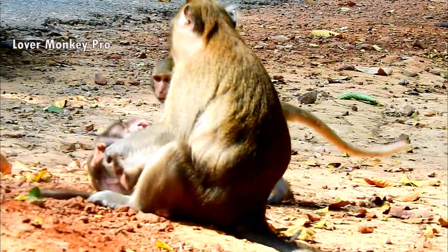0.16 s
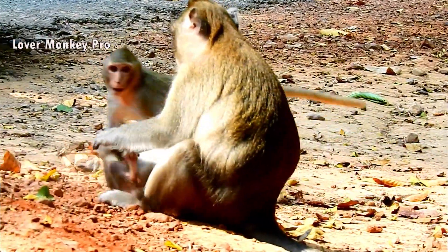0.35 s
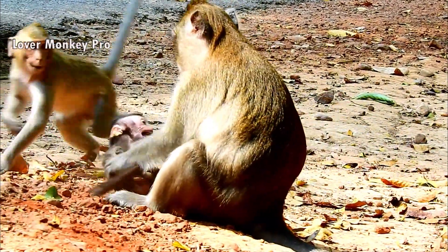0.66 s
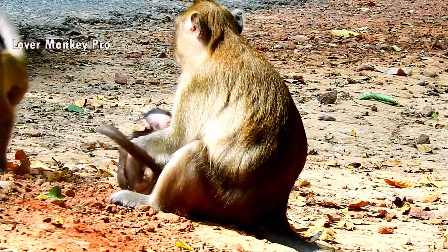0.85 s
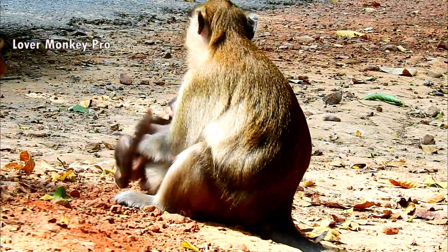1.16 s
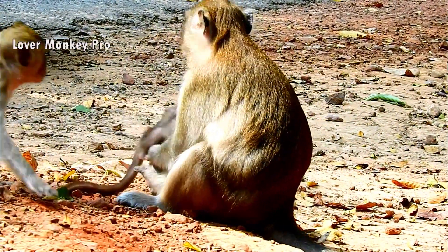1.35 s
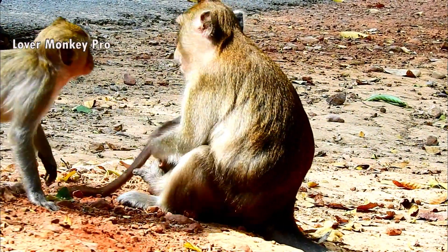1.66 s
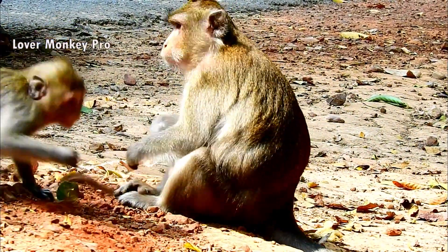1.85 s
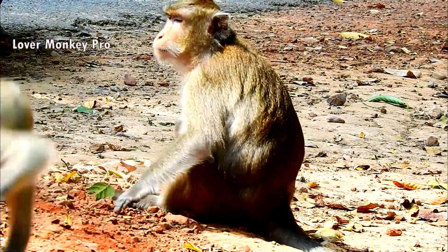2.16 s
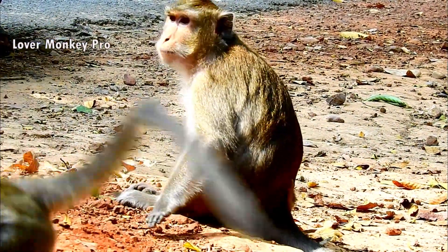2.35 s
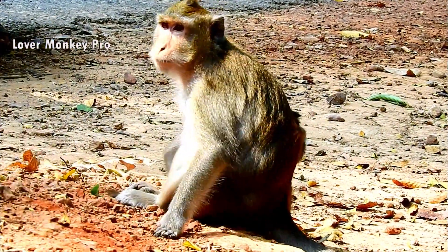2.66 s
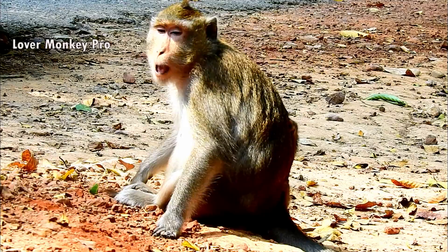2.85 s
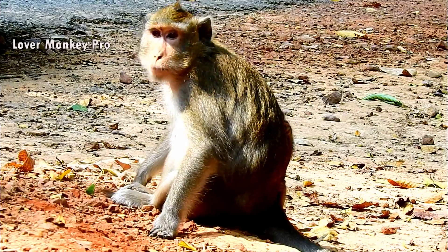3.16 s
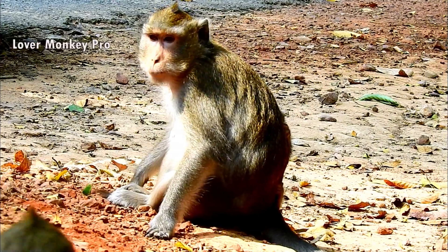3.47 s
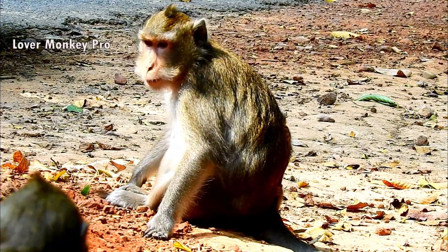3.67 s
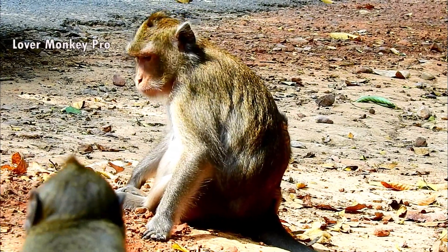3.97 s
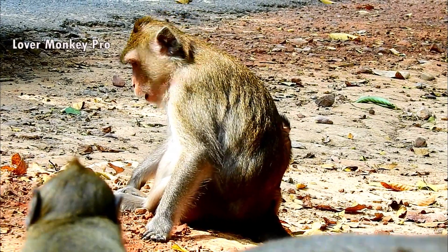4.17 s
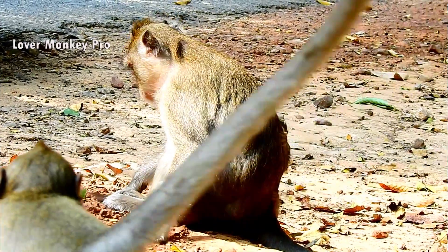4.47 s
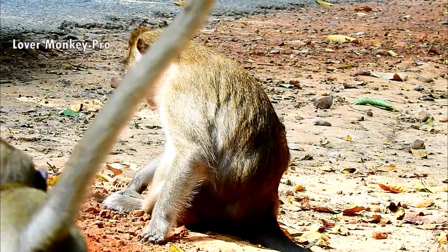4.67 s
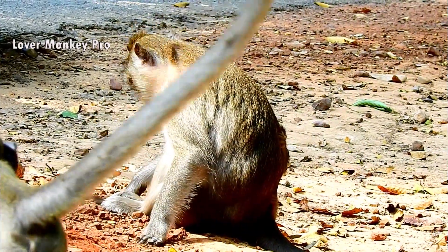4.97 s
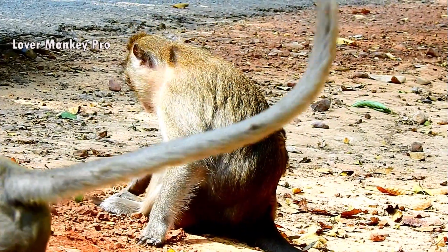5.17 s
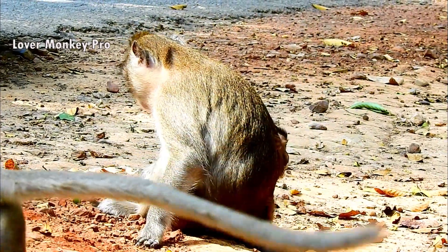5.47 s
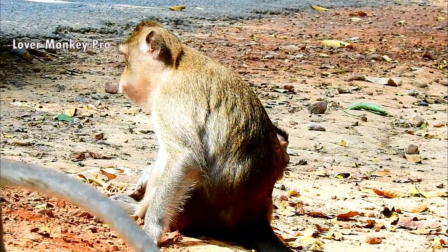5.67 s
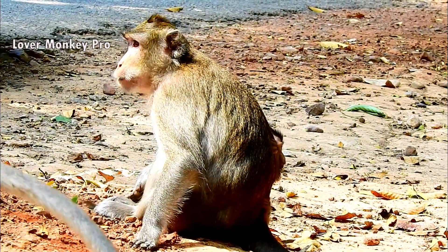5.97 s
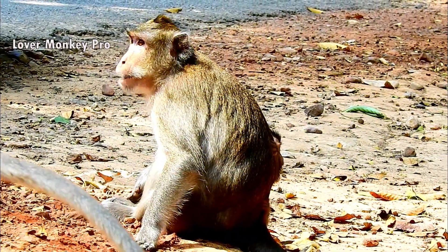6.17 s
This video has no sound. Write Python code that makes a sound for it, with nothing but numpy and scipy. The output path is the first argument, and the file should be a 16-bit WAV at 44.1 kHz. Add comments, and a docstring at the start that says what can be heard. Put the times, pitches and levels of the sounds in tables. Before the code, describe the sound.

From the start to about 1.3 seconds an infant monkey screeches close by: loud, harsh, noisy bursts in a very high register, with thin gliding whistles on top and a short pitched squeal near 0.4. A regular stutter, about nine and a half clicks a second, drops tiny slowed scraps of the earlier sound in with hard edges; between 1.3 and 1.8 it is nearly alone. From 1.85 to 3.0 feet scuff grit and dry leaves, with crisp snaps near 1.93 and 2.57 and the strongest crunch around 2.8. Two smooth rising coos come at about 3.2-3.6 and 3.8-4.1, the second brighter. Faint leaf ticks and weak thin calls follow from 4.3 to 5.6. Around 5.6-6.2 soft coos and a short higher call overlap small scuffs. Quiet open air, faint road rumble, short scatter, stereo.

```python
"""Stuttering macaques on leaf litter

An infant screeches with thin whistles on top, feet scuff leaves and grit, young ones coo and chirp.
Screeches are noise in throat resonances, whistles and calls are sines, litter is clumped ringing cracks.
About nine and a half times a second two slowed scraps of the scene cut in hard, with a short blur behind.
"""
import sys
import numpy as np
from scipy import signal
from scipy.fft import rfft, irfft
from scipy.io import wavfile
from scipy.ndimage import map_coordinates

SR = 44100
rng = np.random.default_rng(int(sys.argv[2]) if len(sys.argv) > 2 else 0)


def file_out(sig):
    """Save sig as 16-bit WAV at sys.argv[1]."""
    # one column per channel
    cols = np.atleast_2d(sig).T
    # limit, then scale
    lim = np.clip(cols, -1, 1)
    pcm = np.round(lim * 32767).astype(np.int16)
    wavfile.write(sys.argv[1], SR, pcm)


N = 279153
FIRST_STUTTER_S, STUTTER_EVERY_S, STUTTER_S = .0402, .10551, .0133


def amp(db):
    """dB to gain."""
    return 10 ** (np.asarray(db) / 20)


def rms_one(x):
    """Scale to rms 1."""
    return x / np.sqrt(np.mean(x ** 2) + 1e-20)


def at_hz(points, hz):
    """Read a spectrum in dB on a log-frequency axis."""
    points_hz, points_db = np.transpose(points)
    return np.interp(np.log(hz), np.log(points_hz), points_db)


def drift(corner_hz):
    """Smooth chance of spread 1: noise through two equal low-pass poles, drawn at every 8th sample."""
    r = np.exp(-16 * np.pi * corner_hz / SR)
    noise = rng.standard_normal(N // 8 + 1202)
    slow = signal.lfilter([1], [1, -2 * r, r * r], noise)[1200:]  # settled part
    return np.interp(np.arange(N) / 8, np.arange(len(slow)), rms_one(slow))


def resonance(x, hz, width_hz):
    """Two poles, gain 1 on top."""
    r = np.exp(-np.pi * width_hz / SR)
    zeros = np.array([1, 0, -1]) * (1 - r * r) / 2
    poles = [1, -2 * r * np.cos(2 * np.pi * hz / SR), r * r]
    return signal.lfilter(zeros, poles, x + 1e-18)


def twice(x, hz, width_hz):
    """The same resonance twice: steep flanks."""
    return resonance(resonance(x, hz, width_hz), hz, width_hz)


def swells(rows):
    """Level in dB of each layer: every event rises to its peak and falls away in straight dB slopes."""
    out = np.full((len(rows[0]) - 3, N), -140.)
    t = np.arange(N) / SR
    for peak_s, *levels_db, rise, fall in rows:
        a, b = max(int((peak_s - .6) * SR), 0), int((peak_s + .9) * SR)
        late_s = t[a:b] - peak_s
        slope_db = np.where(late_s < 0, abs(rise) * late_s, -abs(fall) * late_s)
        out[:, a:b] = np.maximum(out[:, a:b], np.array(levels_db)[:, None] + slope_db)
    return out


def voiced(calls, orders, wobble, flutter_db):
    """Harmonic calls; each partial flutters in level on its own, strain shifts all but the first listed."""
    out, unsteady, fade_s = np.zeros(N), 1 + wobble * drift(48.7), .0091
    # higher partials flutter more
    partials_db = [db + flutter_db * np.sqrt(k) * drift(38) for k, db in orders]
    for rows in calls:
        s, *columns = np.transpose(rows)
        at = np.arange(round(s[0] * SR), min(round((s[-1] + fade_s) * SR), N))
        hz, level_db, strain_db = [np.interp(at / SR, s, c) for c in columns]
        phase = 2 * np.pi * np.cumsum(hz * unsteady[at]) / SR
        first, *over = [amp(db[at]) * np.sin(k * phase) for (k, _), db in zip(orders, partials_db)]
        fade = np.clip(np.minimum(at - at[0], at[-1] - at) / SR / fade_s, 0, 1)
        out[at] += fade * amp(level_db) * (first + amp(strain_db) * sum(over))
    return out


# background spectrum: pitch_hz, relative_db
AIR_SPECTRUM = [(15, -66.5), (25, -11.5), (114, 10), (229, -1.5), (405, 4), (624, -1.5), (887, 0), (962, 8),
                (1260, -6.5), (1650, -52.5), (5570, -58.5), (6560, -22.5), (16000, -52)]
AIR_DB = -76.0  # typical, rms of the part alike in both ears


def air():
    """Far road rumble and hiss: shaped noise, gently patchy, partly alike in both ears."""
    hz = np.maximum(np.fft.rfftfreq(N, 1 / SR), 10)
    shape = amp(at_hz(AIR_SPECTRUM, hz))
    mid, side = irfft(rfft(rng.standard_normal((2, N))) * shape, N)
    return amp(AIR_DB + 2.0 * drift(3.6)) * rms_one(mid + 0.13 * side * np.array([[1], [-1]]))


# throat resonances in four groups (low, mouth, upper, top): pitch_hz, width_per_pass_hz, relative_db
THROAT = [
    [(3170, 430, -11.5), (3874, 370, -4.5), (4223, 460, 3), (4750, 110, 1.5)],
    [(5406, 840, 2), (5976, 500, 0.5), (6720, 280, -0.5), (7454, 390, 0), (7900, 620, -6)],
    [(9296, 990, 5.5), (10500, 800, 0)],
    [(12000, 980, -4.5), (13500, 1000, -17.5)],
]
# screech bursts: peak_s, low_db, mouth_db, upper_db, top_db, rise_db_per_s, fall_db_per_s
BURSTS = [(.034, -47.5, -51.5, -57.5, -70, 3000., 100.), (0.056, -35.5, -26, -26, -36, 4999.5, 500.),
          (.1, -50.5, -39.5, -44, -43, 400., 40.), (.17, -48, -33.5, -39.5, -42, 300., 277.2),
          (0.234, -46, -28, -41, -39.5, 698, 59.5), (0.349, -48, -25, -35.5, -38, 199.5, 701.5),
          (.386, -22, -19.5, -29, -33, 1300., 350.), (0.439, -32.5, -27, -46.5, -65, 100., 170.4),
          (0.594, -34, -23.5, -33, -40, 701, 419), (.66, -49, -44, -50, -51, 99.5, 92.1),
          (.732, -58.5, -42, -48, -48.5, 301, 62), (.85, -59.5, -45, -45, -52, 61.5, 58.5),
          (.905, -43, -50, -39, -41.5, 400., 300.), (0.938, -18.5, -21, -43, -60, 798, 699.5),
          (.975, -34, -40, -58, -80, 300., 200.), (1.09, -22, -55, -65, -87, 2500., 300.),
          (1.115, -26, -30.5, -48.5, -62, 1500., 150.), (1.156, -29.5, -26, -33, -66, 203.5, 243),
          (1.25, -46.5, -43.5, -50.5, -55, 60., 200.), (1.287, -19.5, -21, -52, -80, 1505.5, 221.5)]
GROUP_EDGE = 1.15  # each group is cut this far above its highest resonance


def screeches():
    """Vocal folds flap chaotically: lumpy noise in throat resonances that swell and fade in groups."""
    out = np.zeros(N)
    for modes, level_db in zip(THROAT, swells(BURSTS)):
        folds = rng.standard_normal(N) * amp(2.0 * drift(420))
        band = np.zeros(N)
        for hz, width_hz, db in modes:
            band += amp(db + 3.9 * drift(9.7)) * rms_one(twice(folds, hz, width_hz))
        edge_hz = min(GROUP_EDGE * modes[-1][0], SR / 2.2)
        top_cut = signal.butter(6, edge_hz, fs=SR, output="sos")
        out += amp(level_db) * rms_one(signal.sosfilt(top_cut, band))
    low_cut = signal.butter(6, 2900, "high", fs=SR, output="sos")
    return signal.sosfilt(low_cut, out)


# whistles in the screeches and far chirps:
# start_s, length_s, from_hz, to_hz, first_db, last_db, roughness (0-1)
WHISTLES = [(0.052, .08, 9400, 14940, -25.5, -53.5, .05), (0.143, .075, 14000, 13000, -54, -50, .4),
            (0.211, .14, 13000, 13960, -48, -46, .5), (.095, .06, 4900, 5080, -40, -42, .3),
            (.16, .055, 5050, 5310, -34.5, -34, .12), (.1, .255, 10700, 10500, -48, -44.5, .3),
            (.578, .05, 7800, 13700, -27, -47, .15), (.625, .05, 13600, 13800, -40, -53, .1),
            (0.685, .095, 13700, 12640, -60, -49, .4), (.056, .165, 6910, 6600, -40.5, -55.5, .4),
            (0.258, .105, 7150, 7680, -46, -26.5, .45), (0.561, .16, 4750, 4750, -25.5, -60, .27),
            (0.719, .18, 5640, 5384, -34.5, -42.5, .45), (0.726, .15, 9500, 9170, -56, -43, .15),
            (0.806, .085, 12330, 12300, -50.5, -40.5, .35), (0.922, .15, 4000, 4194, -19, -50.5, .35),
            (1.08, .017, 3700, 3800, -30, -26, .15), (1.108, .15, 4000, 4130, -20.5, -56.5, .15),
            (1.152, .05, 8800, 11600, -32.5, -42.5, .1), (1.208, .085, 12500, 12660, -53, -47, .2),
            (1.273, .035, 3490, 3001, -26, -33.5, .22), (3.54, .06, 4000, 3320, -79, -82, .35),
            (3.86, .07, 4100, 4030, -66, -71, .8), (4.4, .25, 4452, 4254, -78, -89, .3),
            (4.905, .055, 4530, 4400, -77, -74, 0.07), (4.965, .14, 4300, 4180, -64, -70, .35),
            (5.54, .17, 4400, 4150, -63, -69, .35), (5.6, .225, 4880, 4850, -57, -66, .2), ]
GLIDE = 2.2  # time constants of the glide in one whistle


def whistles():
    """Near sines that glide and settle; roughness shakes pitch and level."""
    out, shake, flutter = np.zeros(N), drift(400), drift(99)
    for s, length_s, from_hz, to_hz, first_db, last_db, rough in WHISTLES:
        a, b = round(s * SR), round((s + length_s) * SR)
        u = np.linspace(0, 1, b - a)
        glided = (1 - np.exp(-GLIDE * u)) / (1 - np.exp(-GLIDE))
        hz = from_hz + (to_hz - from_hz) * glided
        phase = 2 * np.pi * np.cumsum(hz + 500 * rough * shake[a:b]) / SR
        fade = np.clip(np.minimum(u, 1 - u) * length_s / 0.0035, 0, 1)
        level_db = first_db + (last_db - first_db) * u + 2.2 * rough * flutter[a:b]
        out[a:b] += fade * amp(level_db) * np.sin(phase)
    return out


# pitched end of one screech: time_s, pitch_hz, level_db, strain_db
SQUEAL = [(.39, 1611, -31.5, 4), (.405, 1613, -27, 6), (.43, 1577, -22, -4), (.47, 1599, -44.5, 6),
          (.56, 1591, -46, 2.5)]
# its partials: multiple, relative_db
SQUEAL_ORDERS = [(2, -6.5), (3, 1), (4, -2.5), (5, -5.5)]


def squeal():
    """Unsteady harmonic voice with no partial at the pitch itself."""
    return voiced([SQUEAL], SQUEAL_ORDERS, wobble=.011, flutter_db=2.2)


# faint low tone: start_s, length_s, nominal_hz (sounds at 0.97 of it), level_db
LOW_TONE = [(.72, 0.33, 434, -72), (1.9, .65, 430, -73), (3.845, 0.23, 387.2, -69)]


def low_tone():
    """A wavering sine that fades in and out."""
    calls = []
    for s, length_s, hz, db in LOW_TONE:
        calls.append([(s, hz, db - 7.5, 0), (s + .25 * length_s, hz, db, 0), (s + length_s, hz, db - 5, 0)])
    return voiced(calls, [(0.97, 0.0042)], wobble=0.011, flutter_db=3.0)


DIP_LEAD_S, DIP_WIDTH_S, DIP_DB = .023, .006, -9


def dips():
    """Gain that sags briefly ahead of every stutter beat."""
    half_s = STUTTER_EVERY_S / 2
    since_dip_s = np.arange(N) / SR - FIRST_STUTTER_S + DIP_LEAD_S
    late_s = (since_dip_s + half_s) % STUTTER_EVERY_S - half_s
    return amp(DIP_DB * np.exp(-(late_s / DIP_WIDTH_S) ** 2))


# one list per coo, before the dips: time_s, pitch_hz, level_db, strain_db
COOS = [
    [(.98, 1147, -76.5, 3), (1.11, 1137, -66, -5), (1.176, 1178, -51.5, -4), (1.25, 1240, -102, 0)],
    [(3.215, 1039, -50, -26), (3.3, 1157, -48, -20), (3.38, 1230, -47.5, -20.5), (3.43, 1328, -40, -16),
     (3.5, 1348, -53.5, -16.5), (3.545, 1300, -74.5, 3), (3.58, 1169, -64, 0.5), (3.62, 1015, -72.5, -23.5),
     (3.7, 999, -76, -5)],
    [(3.77, 1043, -50.5, -20), (3.84, 1192, -52, -15), (3.89, 1318, -45.5, -10), (3.96, 1437, -36, -1.5),
     (4.01, 1408, -38.5, -7), (4.045, 1426, -41, 1), (4.075, 1386, -49, 3.5), (4.105, 1305, -58.5, 4),
     (4.16, 1390, -76.5, 1)],
    [(4.8, 950, -78, -10), (4.83, 960, -65.5, -9), (4.95, 932, -86.5, -14), (5.066, 971, -64, -3),
     (5.15, 1060, -71, -5), (5.226, 968, -71.5, -5), (5.4, 979, -70.5, -7), (5.5, 973, -78, -16)],
    [(5.62, 967, -72, 5.5), (5.68, 957, -58, -14), (5.76, 965, -95.5, -12), (5.8, 993, -57, -22),
     (5.9, 1001, -63, -27), (5.97, 1041, -48.5, -31), (6.03, 1119, -51, -28), (6.12, 1142, -60.5, -27),
     (6.22, 1157, -65.5, 5)],
    [(5.825, 1380, -56, -7), (5.86, 1419, -53.5, -6), (5.892, 1470, -75, -17.5)],
]
# their partials: multiple, relative_db
COO_ORDERS = [(1, 0), (2, -16), (3, -27), (6, -42), (7, -37), (8, -50)]


def coos():
    """Steady harmonic voices whose level dips briefly ahead of every stutter."""
    return dips() * voiced(COOS, COO_ORDERS, wobble=.003, flutter_db=1.1)


def crackle(spectrum, per_s, spread_db, cycles, patchy_db, count=18):
    """Clumped random cracks, dealt to short rings over the spectrum, each pitch in patches; rms 1."""
    sizes = amp(spread_db * np.minimum(rng.exponential(1, N), 5)) * rng.choice([-1, 1], N)
    born = rng.random(N) < per_s * amp(3.0 * drift(60)) / SR
    dealt = rng.integers(0, count, N)
    out = np.zeros(N)
    for k, hz in enumerate(np.geomspace(spectrum[0][0], spectrum[-1][0], count)):
        ring = rms_one(twice(sizes * born * (dealt == k), hz, hz / cycles)) * np.sqrt(hz)
        out += amp(at_hz(spectrum, hz) + patchy_db * drift(31)) * ring
    return rms_one(out)


# litter colours, on top of a sqrt(pitch) tilt: pitch_hz, relative_db
COARSE = [(600, -16), (1000, -1.5), (1500, 1.5), (2100, -5)]
FINE = [(1800, 0.5), (2300, 0.5), (3000, 3), (3800, -19)]
LEAVES = [(3000, -4), (4000, 3), (5200, 10), (6600, 17), (8000, 4), (9500, -39), (13000, -26)]
# feet in the litter, and the coo's breathy noise at 3.936 and 4.07 s: peak_s, coarse_db, fine_db, leaves_db,
# rise_db_per_s, fall_db_per_s
STEPS = [(1.856, -59, -50, -81, 403, 203), (1.94, -58, -62, -41.5, 1499, 150.),
         (1.968, -42, -45, -41.5, 302, 500.), (2.1, -50, -52.5, -48, 150., 180.5),
         (2.316, -53.5, -64, -81, 197, 112.5), (2.352, -54, -75, -43.5, 1504, 355),
         (2.435, -58, -72, -66, 250., 300.), (2.563, -46, -45.5, -40, 900., 509),
         (2.598, -68, -70, -39, 500., 500.), (2.65, -69, -75, -55, 200., 127),
         (2.696, -55.5, -65, -69, 250., 376.5), (2.772, -43, -29.5, -31, 1196, 406),
         (2.83, -47.5, -44.5, -21, 309, 359), (2.878, -56, -50, -38, 298, 200.),
         (1.66, -64, -74, -93.5, 80., 80.), (2.978, -75, -52, -60, 2000., 900.),
         (3.17, -62, -72, -90, 300., 200.), (3.02, -68, -84, -88, 299, 25.),
         (3.936, -58, -71.5, -80.5, 301.5, 70), (4.07, -62.5, -72.5, -94.5, 62, 161),
         (4.3, -84.5, -88.5, -67, 1400., 549.5), (4.608, -72.5, -74.5, -96, 400., 160.),
         (4.658, -76.5, -89, -64, 2993, 379), (4.736, -78, -83, -56.5, 748, 262.5),
         (4.85, -69, -68, -90, 100., 100.), (4.888, -80, -80, -70, 900., 300.),
         (5.03, -81, -82, -85, 62, 64), (5.135, -75.5, -80, -57, 700., 129),
         (5.19, -80, -80, -61, 300., 250.), (5.292, -76.5, -76, -64.5, 400.5, 157),
         (5.44, -80, -81, -68, 148, 117), (5.63, -69.5, -70, -69.5, 405.5, 90.),
         (5.72, -75, -65.5, -80, 142, 194), (5.835, -56, -48.5, -66, 507, 100.),
         (5.885, -51.5, -49, -52.5, 255, 182), (6.06, -67.5, -55.5, -61, 399.5, 78),
         (6.08, -69, -65, -50, 548.5, 350.), (6.188, -62, -68.5, -63, 378, 150.),
         (6.3, -62.5, -79, -82.5, 59, 60.)]
RASP_DB = -31.5  # against the low resonances of the bursts


def scuffs():
    """Grit grinds low, dry leaves crackle high; the screeches' faint rasp shares the coarse colour."""
    coarse_db, fine_db, leaves_db = swells(STEPS)
    rasp_db = swells(BURSTS)[0] + RASP_DB
    grit = crackle(COARSE, per_s=2500., spread_db=3.1, cycles=4.0, patchy_db=7.9, count=8)
    coarse = (amp(coarse_db) + amp(rasp_db)) * grit
    fine = amp(fine_db) * crackle(FINE, per_s=4000., spread_db=3.6, cycles=6.8, patchy_db=4.5, count=8)
    leaves = amp(leaves_db) * crackle(LEAVES, per_s=7000., spread_db=1.6, cycles=8.9, patchy_db=3.1)
    return coarse + fine + leaves


# single leaves and twigs: start_s, peak_db, pitch_hz
SNAPS = [(1.934, -22.5, 6500), (1.9526, -37, 6900), (2.024, -31.5, 6640), (2.0408, -37, 1630),
         (2.3378, -37.5, 1806), (2.351, -33, 6180), (2.565, -20, 3594), (2.905, -32, 6260),
         (2.9436, -50, 5230), (2.9773, -56, 6550), (4.2965, -46.5, 6674), (4.6049, -54.5, 1470),
         (4.659, -50.5, 6960), (4.7318, -45, 6500), (4.887, -53.5, 6460), (5.1299, -39, 6130),
         (5.2903, -51, 7800), (5.416, -50.5, 7520), (5.434, -44, 7530), (5.736, -42.5, 2603)]


def snaps():
    """A few ms of noise rings at the pitch of the thing that breaks."""
    length = 900
    out, t = np.zeros(N + length), np.arange(length) / SR
    for s, peak_db, hz in SNAPS:
        burst = rng.standard_normal(length) * np.exp(-t / 0.0023)
        crack = twice(burst, hz, 0.099 * hz)
        a = round(s * SR)
        out[a:a + length] += amp(peak_db) * crack / np.abs(crack).max()
    return out[:N]


def widened(x, side_db=-7):
    """First bounces off the ground, opposite in sign left and right, mostly in the treble."""
    bounces = np.diff(rng.standard_normal(300) * np.exp(-np.arange(300) / 90.))
    bounces = bounces / np.sqrt(np.sum(bounces ** 2))
    return amp(side_db) * signal.fftconvolve(x, bounces)[:N] * np.array([[1], [-1]])


def surroundings(x, t60_s=0.28):
    """Scatter from trunks and ground: a short dull tail, unlike in both ears."""
    t = np.arange(round(.4 * SR)) / SR
    tail = rng.standard_normal((2, len(t))) * amp(-60 * t / t60_s) * np.minimum(t / 0.011, 1)
    tail = signal.lfilter([.4], [1, -.6], tail)
    tail /= np.sqrt(np.sum(tail ** 2, 1, keepdims=True))
    return signal.fftconvolve(x[None], tail, axes=1)[:, :N]


# balance of the direct sound: time_s, left_over_right_db
PAN = [(0.0, -0.5), (1.73, 0.5), (2.54, 4), (2.82, -2), (3.21, 9), (3.51, -3), (4.09, 3.5), (4.18, -0.5),
       (4.9, 8), (5.09, -6), (5.39, 3.5), (5.68, 3), (5.77, 11.5), (6.08, 7), (6.33, 4)]


def scene():
    """All sources, placed and scattered."""
    near = screeches() + whistles() + squeal() + low_tone() + coos() + scuffs() + snaps()
    pan_db = np.interp(np.arange(N) / SR, *np.transpose(PAN))
    direct = near * amp([pan_db / 2, -pan_db / 2])
    return direct + widened(near) + amp(-10) * surroundings(near) + air()


SLOWED, AGES_S = .88, (.514, .425)  # speed of both scraps, age of each


def slowed_scrap(dry, a, b, age_s):
    """Earlier sound at lower speed and pitch; where none is old enough, time mirrors at zero."""
    at = np.abs(a - age_s * SR + SLOWED * np.arange(b - a))
    first, last = int(at.min()), int(at.max())
    return np.array([map_coordinates(ear[first:last + 2], [at - first]) for ear in dry])


def blurred(x, level_db=-14, t60_s=0.087):
    """A brief noisy blur of the scrap's own colour follows it."""
    blur = rng.standard_normal(1600) * amp(-60 * np.arange(1600) / SR / t60_s)
    blur = signal.sosfilt(signal.butter(2, 900, "high", fs=SR, output="sos"), blur)
    return amp(level_db) * signal.fftconvolve(x, blur[None] / np.linalg.norm(blur), axes=1)[:, :N]


# stutters of set level, two scraps end to end: start_s, first_scrap_ms, first_db, second_db
STUTTERS = [(0.0399, 8.9, -43.5, -36.5), (0.1468, 13, -40.5, -41), (0.2514, 9.2, -44.5, -40),
            (0.3577, 7.5, -44, -41), (0.463, 5.8, -34, -32), (0.5677, 10.5, -22.5, -32.5),
            (0.6734, 9.3, -33.5, -29.5), (0.7787, 11.8, -31, -23), (0.8838, 9.7, -31, -32),
            (0.99, 10.2, -29.5, -37), (1.0958, 4.5, -42, -26), (1.2021, 8.8, -35.5, -43),
            (1.3063, 6.2, -38.5, -35), (1.4121, 7.9, -43, -35.5), (1.5179, 7.1, -34.5, -24),
            (1.6227, 8.9, -28, -31), (1.728, 10.5, -35.5, -23), (1.8332, 7.9, -25, -27.5),
            (1.939, 9, -41.5, -52), (2.2572, 5.4, -70.1, -46.5), (2.361, 6.3, -48.5, -38.5),
            (2.4668, 11.8, -39.5, -59), (2.5713, 8.9, -42.7, -49), (2.783, 7.5, -43, -39.5),
            (2.8889, 11, -46.5, -69), (2.996, 8.7, -55, -27.5), (3.1, 8.2, -29.5, -61),
            (3.2059, 5.3, -44, -28.5), (3.311, 7, -29.5, -35.5), (3.4148, 10, -41, -50.5),
            (3.732, 13, -52, -48.5), (3.8381, 9.4, -51.5, -45), (3.945, 9, -43.5, -59.5),
            (4.2603, 7.7, -80, -54.5), (4.3661, 9.1, -51.5, -40.5), (4.4724, 11.4, -39.5, -56),
            (4.577, 9.8, -47, -54), (5.8439, 12.2, -53.5, -45), (6.054, 12, -54, -61),
            (6.1598, 12, -59, -44), (6.2643, 10.1, -50.5, -44.5)]
# all other stutters: level against the sound they repeat, range of the first scrap's length
FAINT_SCRAP_DB, FAINT_FIRST_MS = 0.5, (11, 12.)
CUTOFF_HZ = 16500


def record(dry):
    """Each stutter is overwritten by two slowed scraps, hard cut, with a blur behind; the top is cut."""
    out, scraps = dry.copy(), np.zeros_like(dry)
    listed = {round((row[0] - FIRST_STUTTER_S) / STUTTER_EVERY_S): row for row in STUTTERS}
    beats_s = np.arange(FIRST_STUTTER_S, N / SR - STUTTER_S, STUTTER_EVERY_S)
    faint_ms = rng.uniform(*FAINT_FIRST_MS, len(beats_s))
    for k, (beat_s, seam_ms) in enumerate(zip(beats_s, faint_ms)):
        s, first_ms, *levels_db = listed.get(k, (beat_s, seam_ms, None, None))
        seams = np.round(np.array([s, s + first_ms / 1000, s + STUTTER_S]) * SR).astype(int)
        for a, b, age_s, db in zip(seams, seams[1:], AGES_S, levels_db):
            scrap = slowed_scrap(dry, a, b, age_s)
            if db is None:
                gain = amp(FAINT_SCRAP_DB)
            else:
                gain = amp(db) / np.sqrt(np.mean(scrap.mean(0) ** 2) + 1e-20)
            scraps[:, a:b] = gain * scrap
        out[:, seams[0]:seams[-1]] = 0
    out += scraps + blurred(scraps)
    return signal.sosfilt(signal.cheby2(16, 90, CUTOFF_HZ, fs=SR, output="sos"), out)


dry = scene()
out = record(dry)
file_out(out)
```